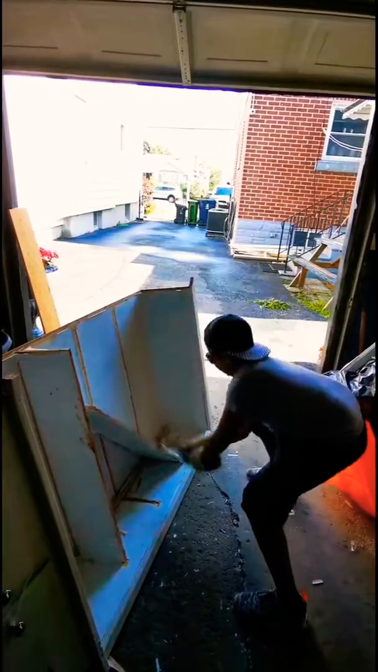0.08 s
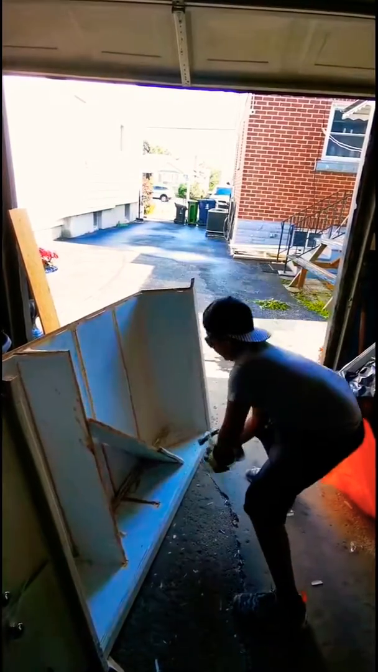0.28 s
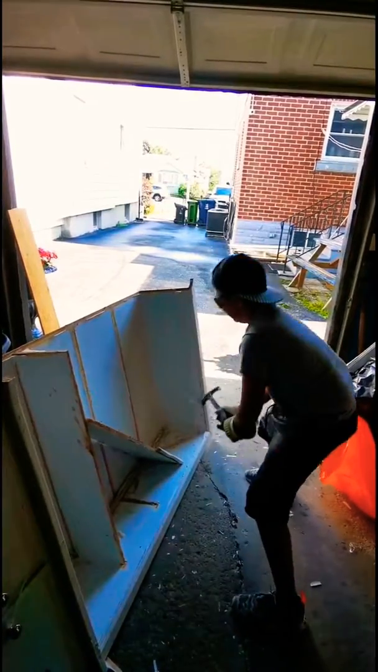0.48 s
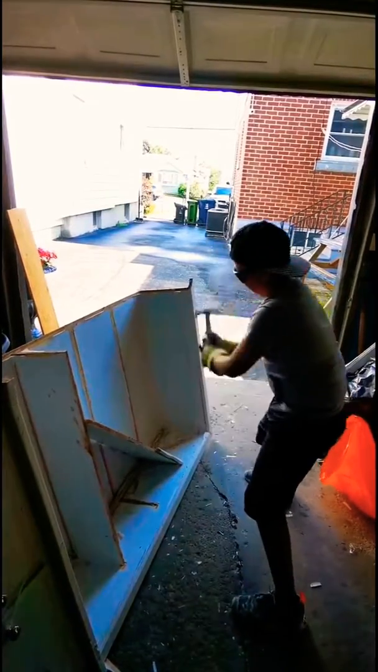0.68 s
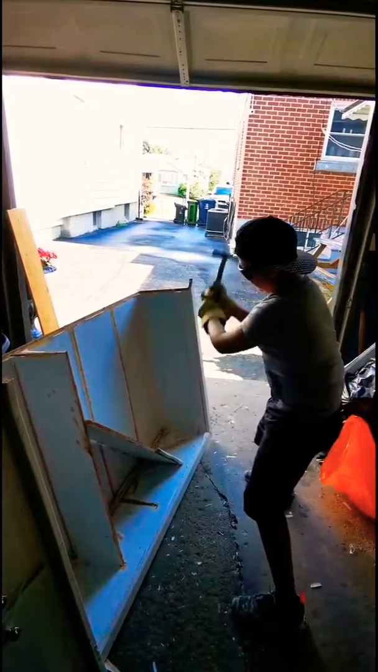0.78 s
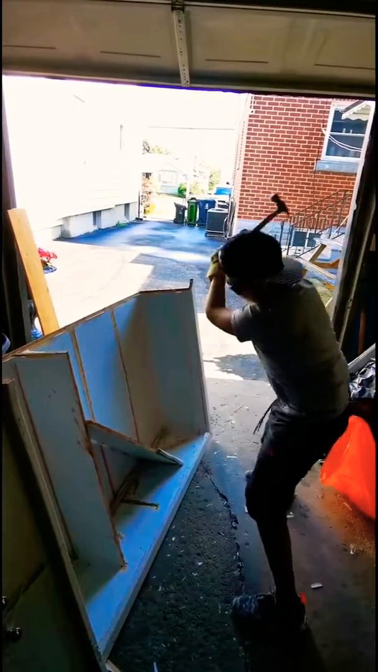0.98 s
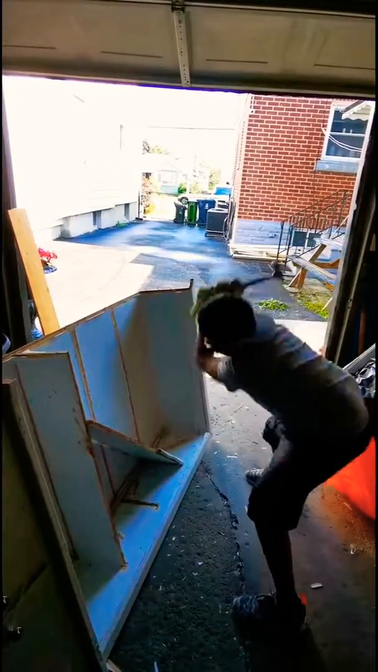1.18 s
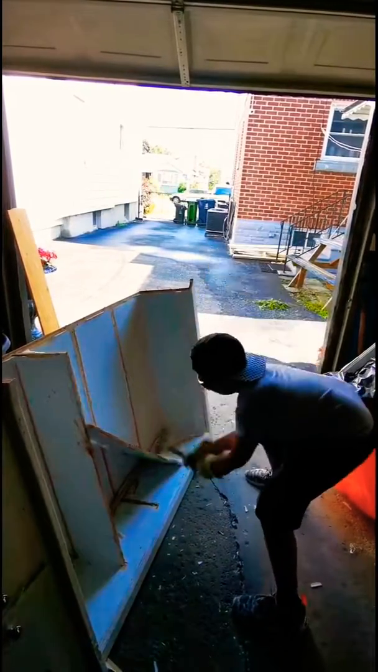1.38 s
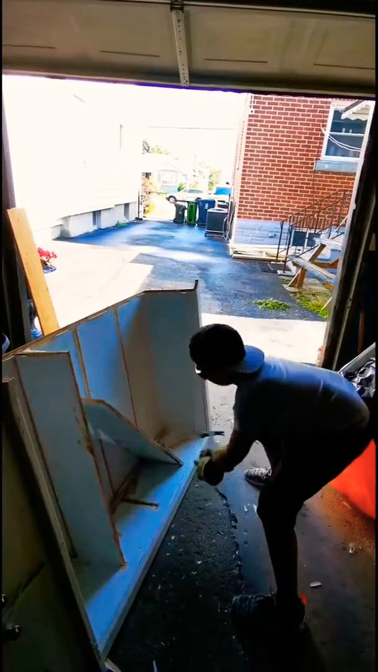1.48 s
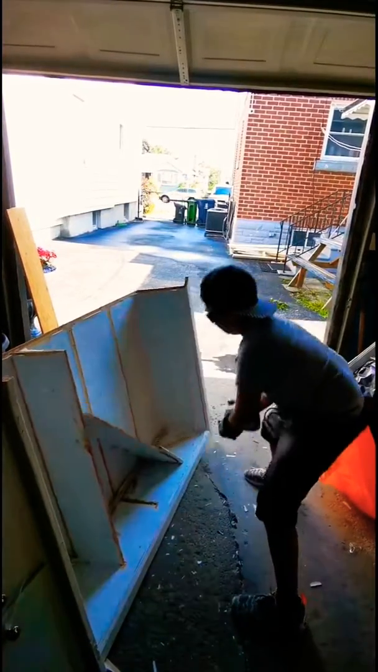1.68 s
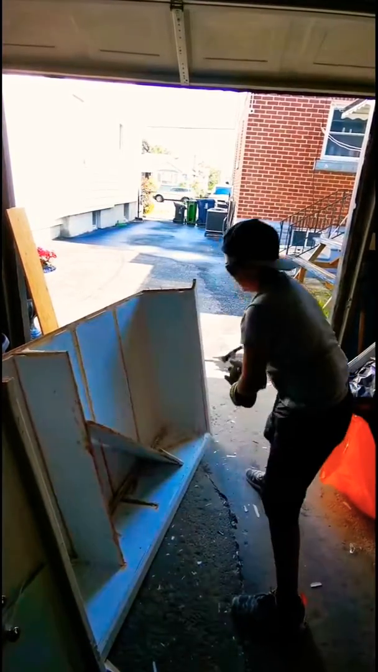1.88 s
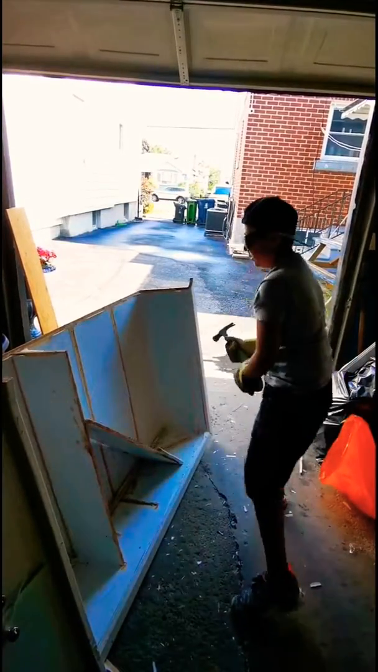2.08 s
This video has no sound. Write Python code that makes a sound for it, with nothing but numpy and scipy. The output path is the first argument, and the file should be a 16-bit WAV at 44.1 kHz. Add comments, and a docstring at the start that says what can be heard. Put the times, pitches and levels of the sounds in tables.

```python
"""Over a faint low hum in an open garage, a hammer strikes a wooden cabinet: its panels crack
and ring in their normal modes, overloading the microphone. A loose board knocks, a foot falls
and the cabinet rocks with a low boom. A shoe scuffs on gritty concrete, leaving a metallic
ring, and a thin trill follows. At 1.5 s the hammer strikes again; then come another knock,
more booms, ticks of grit and splinters, and a heavier step, all prolonged by reverberation."""
import sys
import numpy as np
from scipy import signal
from scipy.fft import rfft, irfft
from scipy.io import wavfile
from scipy.ndimage import uniform_filter1d

SR = 44100
rng = np.random.default_rng(int(sys.argv[2]) if len(sys.argv) > 2 else 0)


def store_wav(level_fs):
    """Save 16-bit WAV to argv[1]."""
    pcm = np.round(np.clip(np.atleast_2d(level_fs), -1, 1) * 32767)
    wavfile.write(sys.argv[1], SR, pcm.T.astype(np.int16))


N = 92610
T = np.arange(N) / SR
FREQS = np.maximum(np.fft.rfftfreq(N, 1 / SR), 1)
MIC_DELAY_S = np.array([[0.00012], [0]])  # left, right

# centres of an impact's bass, body, bite and treble: frequency_hz
COLOUR_HZ = [150, 600, 2200, 9000]
# shoe and clothing rubs: peak_s, level_db, rise_s, fall_s, tilt_db_per_octave
RUBS = [(0.061, -61, 0.025, 0.016, -2.5), (0.149, -65, 0.23, 0.14, -1.5), (0.591, -44, 0.038, 0.047, 1.5),
        (1.13, -67.5, .06, 0.11, -3.5), (1.43, -61.5, .1, 0.17, 0.5), (2.01, -50.5, 0.024, 0.12, 2)]


def undb(db):
    """Amplitude ratio of a level in decibels."""
    return 10 ** (np.asarray(db) / 20)


def curve(points, hz):
    """Interpolation of (frequency, value) points on a logarithmic frequency axis."""
    p = np.array(points, float)
    return np.interp(np.log(hz), np.log(p[:, 0]), p[:, 1])


def pan(db):
    """Left and right gains for a level difference, left minus right."""
    return undb(np.array([[1], [-1]]) * db / 2)


def noise(spectrum, extra_db=0):
    """Partially coherent noise at two microphones: unit power, then shaped by extra_db."""
    # likeness of the channels: frequency_hz, correlation (before clipping to 0-1)
    likeness = [(40, 1.1), (130, 0.96), (250, 0.9), (500, 1.84), (1000, -0.57), (2000, 1.34), (6000, 0.38)]
    mid, side = rfft(rng.standard_normal((2, N)))
    like = np.clip(curve(likeness, FREQS), 0, 1)
    pair = np.sqrt((1 + like) / 2) * mid + np.sqrt((1 - like) / 2) * side * np.array([[1], [-1]])
    gain = undb(curve(spectrum, FREQS))
    return irfft(pair * gain / np.sqrt(np.mean(gain ** 2)) * undb(extra_db), N)


def envelope(start, rise, t60):
    """Smooth onset and exponential decay, falling 60 dB in t60 seconds."""
    age = np.maximum(T - start, 0)
    return (1 - np.exp(-(age / rise) ** 2)) * np.exp(-np.minimum(np.log(1000) * age / t60, 20))


def damp(x, start, rise, t60s):
    """Frequency-dependent damping: each octave decays at its own rate."""
    octaves, spectrum = np.arange(6, 15), rfft(x)
    return sum(irfft(spectrum * np.interp(np.log2(FREQS), octaves, 1. * (octaves == k)), N)
               * envelope(start, rise, curve(t60s, 2. ** k)) for k in octaves)


def grain(depth_db, samples=60):
    """Random amplitude modulation, heard as roughness."""
    flicker = uniform_filter1d(rng.standard_normal(N), samples)
    return undb(depth_db * flicker / flicker.std())


def ring(modes, start, rise, pitch, colour):
    """Superposition of damped modes of alternating sign; pitch multiplies every frequency."""
    age = T - start - MIC_DELAY_S
    return sum((-1) ** k * undb(db + curve(colour, hz)) * pan(side)
               * np.sin(2 * np.pi * hz * pitch * age) * envelope(start, rise, t60)
               for k, (hz, db, t60, side) in enumerate(modes))


def placed(x):
    """Path difference and shadowing: sound reaches the left microphone later and partly shaded."""
    # shading: frequency_hz, pan_db
    balance = [(60, 0.5), (170, 3.5), (450, -8), (1000, -2), (1500, -7.5), (2100, -11), (4000, -1),
               (8500, -2.5), (12000, -9)]
    delay = np.exp(-2j * np.pi * FREQS * MIC_DELAY_S)
    return irfft(rfft(x) * delay * pan(curve(balance, FREQS)), N)


def background():
    """Ambient noise: broadband outdoor air through the open door, and a hum of pure tones."""
    # air spectrum: frequency_hz, density_db
    spectrum = [(15, -33.5), (25, -5), (54, 3), (81, -6.5), (243, -11.5), (264, -13), (301, -11.5),
                (450, -28), (811, -15.5), (2630, -34.5), (3730, -42.5), (4040, -39), (15000, -49)]
    # hum tones: pitch_hz, level_db
    tones = [(52, -63), (116, -58), (296, -62)]
    # balance of the air: frequency_hz, pan_db
    balance = [(60, 2), (200, 0), (500, -10.5), (1000, -2), (2200, -18.5), (4500, 3.5), (12000, -8)]
    air = irfft(rfft(noise(spectrum)) * pan(curve(balance, FREQS)), N)
    hum = sum(undb(db) * np.sin(2 * np.pi * (hz * T + rng.random())) for hz, db in tones)
    return undb(-53.5) * air + hum


def garage(x):
    """Diffuse reverberation: convolution with an impulse response of decaying noise."""
    # reverberation time: frequency_hz, t60_s
    decay = [(70, 0.7), (250, 0.8), (700, 0.47), (2200, 0.43), (6000, 0.4), (13000, 0.82)]
    # reverberant level relative to the input: frequency_hz, gain_db
    response = [(50, -17), (90, 5), (300, -7), (1000, -8.5), (2500, -11), (6000, -13), (14000, -19)]
    build_s, smoothing_hz = 0.01, 45
    tail = rfft(damp(noise([(1, 0)]), 0, build_s, decay))
    power = uniform_filter1d(np.abs(tail) ** 2, int(smoothing_hz * N / SR), axis=1)
    impulse = irfft(tail * undb(curve(response, FREQS)) / np.sqrt(power), N)[:, :N // 2]
    return signal.fftconvolve(x, impulse, axes=1)[:, :N]


def trill():
    """Amplitude modulation shapes two high partials into three faint, fluttering notes."""
    # partials: pitch_hz, level_db
    partials = [(3725, -65.5), (6670, -79.5)]
    # notes: start_s, gain_db
    notes = [(1.078, 9), (1.128, -8), (1.228, -7.5)]
    tone = sum(undb(db) * np.sin(2 * np.pi * hz * T) for hz, db in partials)
    pulses = sum(undb(db) * envelope(start, rise=0.0024, t60=0.26) for start, db in notes)
    return tone * grain(2.5, samples=300) * pulses


def rubs():
    """Sliding friction of sole and clothing makes grainy swells of hiss."""
    # friction spectrum: frequency_hz, density_db
    spectrum = [(300, -0.5), (1200, -2), (1900, -4), (2250, 4), (2800, -4), (3800, 0), (4300, -1),
                (5000, -2.5), (7000, -5.5), (11000, -2.5), (15500, -9)]
    octaves = np.log2(np.maximum(FREQS, 500) / 5000)
    hiss = 0
    for peak, db, rise, fall, tilt in RUBS:
        swell = np.exp(-((T - peak) / np.where(T < peak, rise, fall)) ** 2 / 2)
        hiss += undb(db) * noise(spectrum, tilt * octaves) * swell
    return pan(-4.5) * hiss * grain(depth_db=1)


def scrape_ring():
    """Free vibration: the strongest rub leaves a faint metallic ring."""
    # metallic modes: base_hz, level_db, t60_s, pan_db
    modes = [(2130, -14.5, 0.91, -9), (2290, -15.5, 0.67, -17), (4290, -3, .5, 0), (4420, -24, .5, 1)]
    peak, db, rise, *_ = max(RUBS, key=lambda row: row[1])
    return undb(db) * ring(modes, peak - rise, rise, pitch=0.94, colour=[(1, 0.0082)])


def ticks():
    """Brief transients have broad spectra: grit and splinters give bright clicks."""
    # clicks: start_s, level_db, t60_s, tilt_db_per_octave, pan_db
    clicks = [(1.057, -53, .02, 7, -3), (1.738, -41.5, 0.12, 16, 2), (1.8186, -16, 0.014, 10, -3),
              (1.825, -30, 0.017, 1, -2), (1.9722, -29, 0.025, 10, -11.5), (2.077, -30, 0.11, 1.5, -5.5)]
    # click spectrum before the tilt: frequency_hz, density_db
    spectrum = [(200, 6.5), (1200, 3), (4000, 5), (8000, -7), (13000, -12), (16000, -28)]
    octaves = np.log2(FREQS / 8000)
    return placed(sum(undb(db) * pan(side) * noise(spectrum, tilt * octaves)
                      * envelope(start, 0.000445, t60) for start, db, t60, tilt, side in clicks))


def steps():
    """Soft impacts: each footfall excites heavily damped modes and a dull crunch under the sole."""
    # footfalls: start_s, level_db, rise_s, pitch_ratio
    footfalls = [(0.402, -24.5, 0.057, 2.6), (1.927, -12.5, 0.025, 1.0)]
    # thud modes: base_hz, level_db, t60_s, pan_db
    modes = [(187, -8.5, 0.17, -6), (273, -0.5, 0.14, -5), (337, -5, 0.17, 2), (440.6, 3.5, 0.094, -9.5),
             (546, -7, 0.088, 1), (710, -10, 0.09, -4)]
    # crunch spectrum: frequency_hz, density_db
    sole = [(60, -15), (180, 22), (450, 6), (700, -11), (1100, -24), (3000, -47)]
    out = 0
    for start, db, rise, pitch in footfalls:
        thud = ring(modes, start, rise, pitch, colour=[(1, 0.026)])
        crunch = undb(-2) * placed(noise(sole)) * envelope(start, rise, t60=0.13)
        out += undb(db) * (thud + crunch)
    return out


def rocking():
    """A damped oscillator: the cabinet booms at one low pitch as it rocks on the floor."""
    # booms: start_s, level_db
    booms = [(0.436, -40), (1.837, -40), (1.988, -43.5)]
    boom_hz = 79.6
    return sum(undb(db) * np.sin(2 * np.pi * boom_hz * (T - start))
               * envelope(start, rise=0.0067, t60=0.48) for start, db in booms)


def panel_ring(hits):
    """Impulse excitation: each hit sets the cabinet's normal modes ringing."""
    # cabinet modes: base_hz, level_db, t60_s, pan_db
    modes = [(168.7, -12.5, 0.32, -1), (211.7, -5, 0.091, 6), (261.2, -6.5, 0.29, 1),
             (350.5, -10, 0.078, -1.5), (371.6, -1, 0.12, 2.5), (426.3, -3.5, 0.083, -5),
             (445, 0.5, 0.17, -10), (509, -9.5, .1, -6), (609.5, -16.5, .13, -14), (695, -7.5, 0.15, -7.5),
             (826, -9, 0.19, -2), (928, -12, 0.16, -0.5), (1080, -19, 0.097, 0), (1906, -8, 0.14, -4.5),
             (1985, -8, 0.21, -9), (2195, -13, 0.13, -4.5), (2272, -15.5, 0.23, -7),
             (2352, -7.5, .16, -8.5), (2462, -16.5, .16, -4)]
    return sum(undb(db) * ring(modes, start, rise=0.0035, pitch=pitch, colour=list(zip(COLOUR_HZ, tone)))
               for start, db, _, pitch, _, _, *tone in hits)


def wood_crack(hits):
    """Modal overlap: dense resonances merge into noise as the wood snaps, splinters and slaps back."""
    # dense panel resonances: frequency_hz, density_db
    panel = [(30, -25), (70, -10.5), (110, -21), (190, -6), (380, -2.5), (560, -7.5), (1000, -4),
             (1500, -10), (2000, -5), (2450, -5), (3000, -12), (5000, -18), (7000, -26), (8400, -28.5),
             (9600, -23.5), (12000, -26.5), (16000, -36)]
    # their damping: frequency_hz, t60_s
    decay = [(60, 0.27), (300, 0.12), (1000, 0.18), (2300, 0.17), (5000, 0.3), (13000, 0.11)]
    contact_db, attack_s = 3.5, 0.0021
    out = 0
    for start, _, crack_db, _, rebound_s, rebound_db, *tone in hits:
        colour = curve(list(zip(COLOUR_HZ, tone)), FREQS)
        snap = noise(panel, colour) * envelope(start, rise=0.0017, t60=0.018)
        out += undb(crack_db + contact_db) * snap
        for at, db in ((start, crack_db), (start + rebound_s, crack_db + rebound_db)):
            out += undb(db) * damp(noise(panel, colour), at, attack_s, decay) * grain(depth_db=2)
    return placed(out)


def scene():
    """Superposition of direct sound, reverberation and ambient noise."""
    # hammer blows: start_s, ring_db, crack_db, pitch_ratio, rebound_delay_s, rebound_db,
    # bass_db, body_db, bite_db, treble_db
    blows = [(0.1987, -11, -9, 0.93, .0175, -4.5, -1.5, 2, -0.66, 0.5),
             (1.4915, -9.5, -11, 0.99, 0.01375, -7.5, 0, 1.3, 3.7, 3)]
    # knocks of loose boards: same columns
    knocks = [(0.3943, -31.5, -24.5, .98, .012, -8, 5.2, 1.8, -6, -1),
              (1.8169, -28.5, -20, 1.14, 0.02, -6, 9, 2.3, -4, -5)]
    hits = blows + knocks
    ringing = panel_ring(hits) + steps()
    rest = wood_crack(hits) + rocking() + ticks() + trill() + rubs() + scrape_ring()
    reverberation = garage(rest + undb(-6) * ringing)
    return ringing + rest + reverberation + background()


def record(dry):
    """Saturation: the microphone flattens the loudest peaks, then a low-pass cuts the top."""
    cutoff_hz = 15300
    clipped = dry / (1 + dry ** 6) ** (1 / 6)
    return signal.sosfilt(signal.ellip(8, .2, 70, cutoff_hz, fs=SR, output="sos"), clipped)


dry = scene()
out = record(dry)
store_wav(out)
```